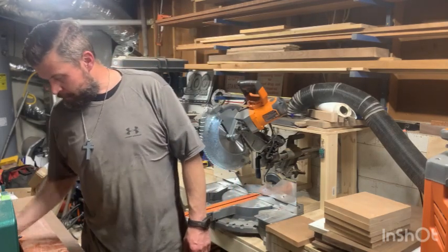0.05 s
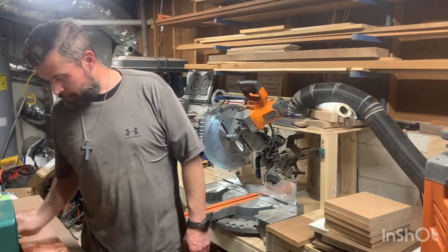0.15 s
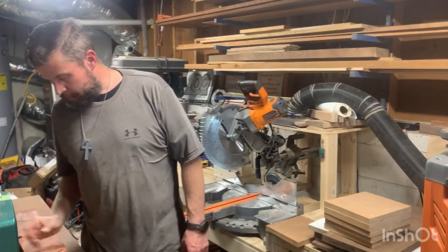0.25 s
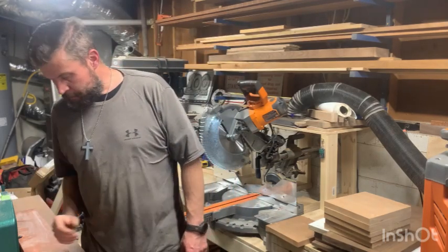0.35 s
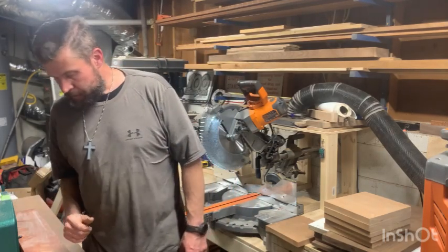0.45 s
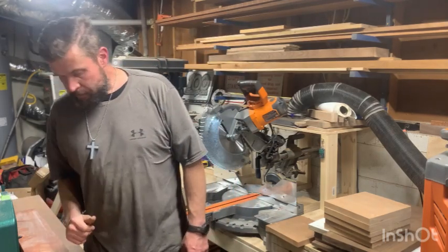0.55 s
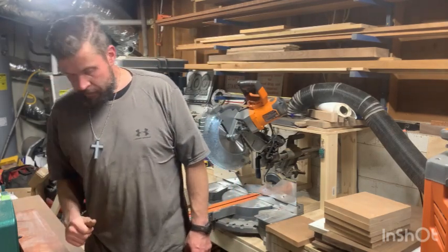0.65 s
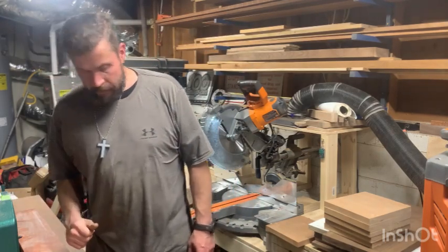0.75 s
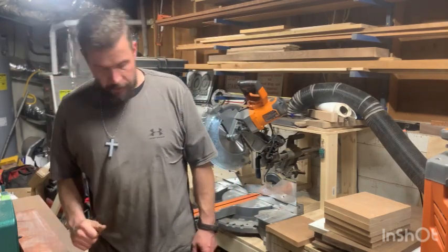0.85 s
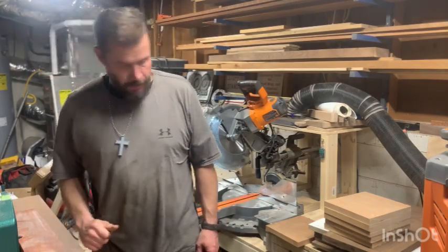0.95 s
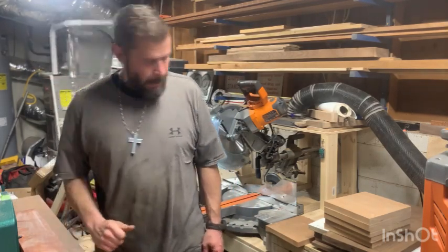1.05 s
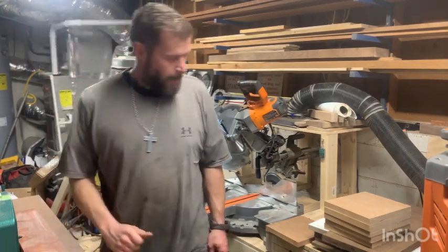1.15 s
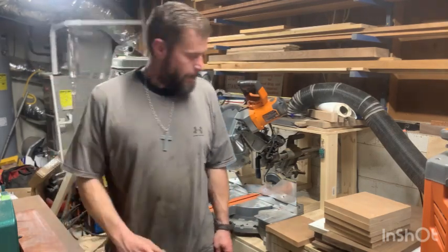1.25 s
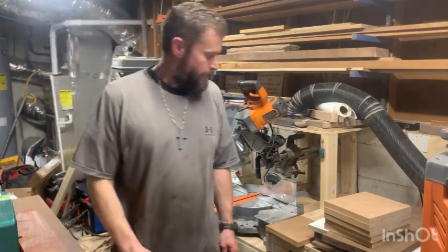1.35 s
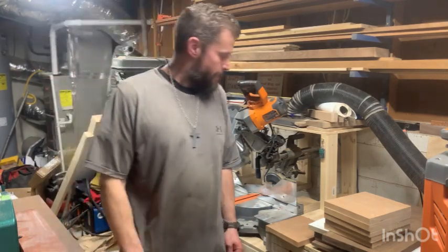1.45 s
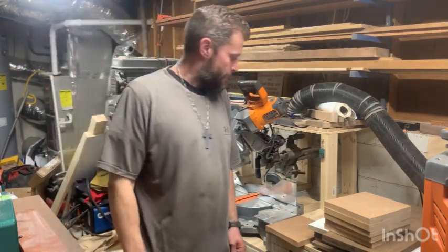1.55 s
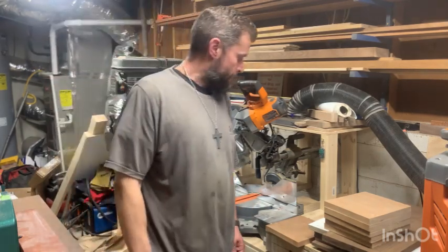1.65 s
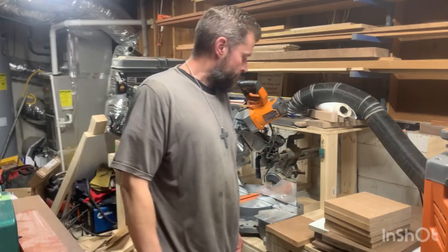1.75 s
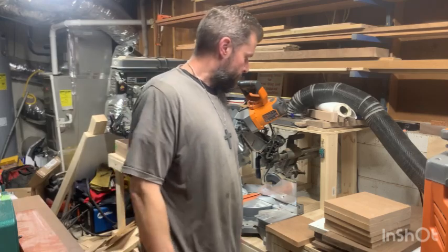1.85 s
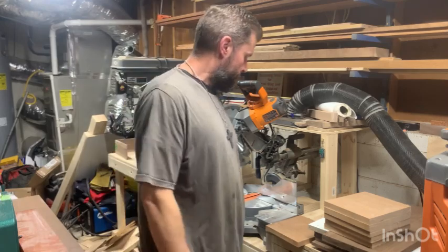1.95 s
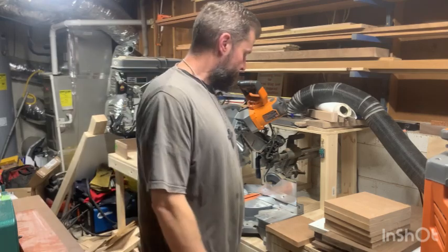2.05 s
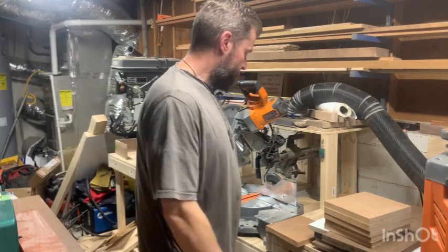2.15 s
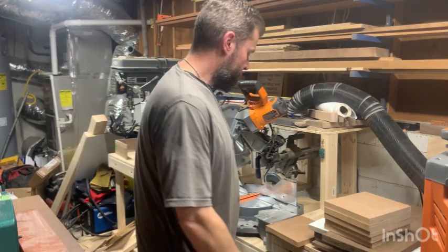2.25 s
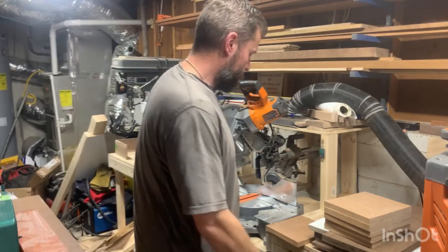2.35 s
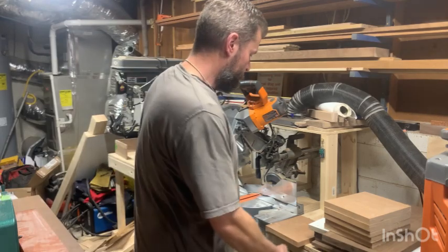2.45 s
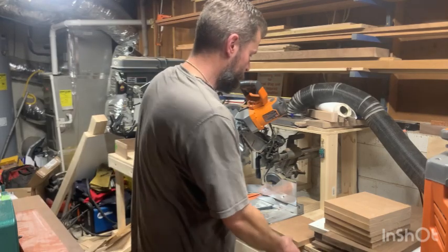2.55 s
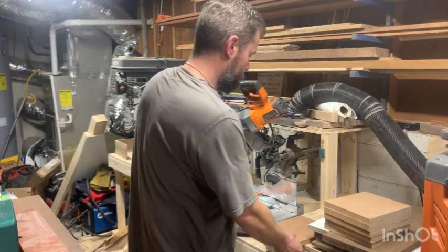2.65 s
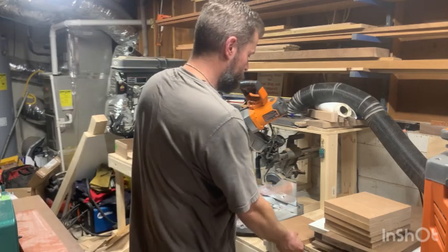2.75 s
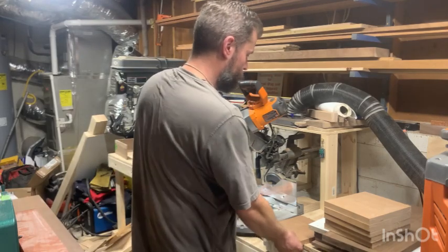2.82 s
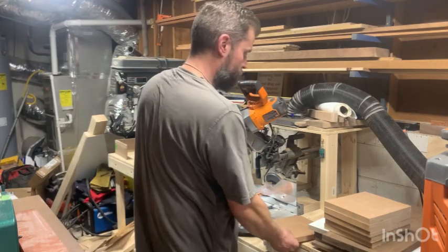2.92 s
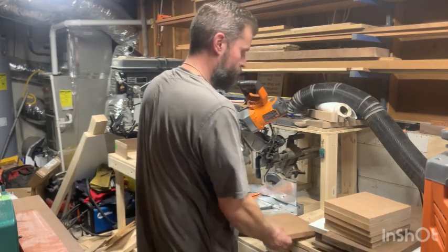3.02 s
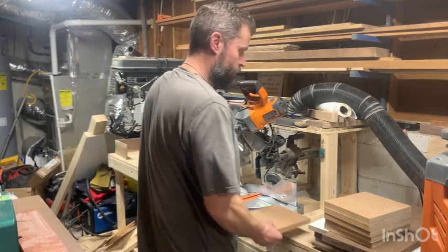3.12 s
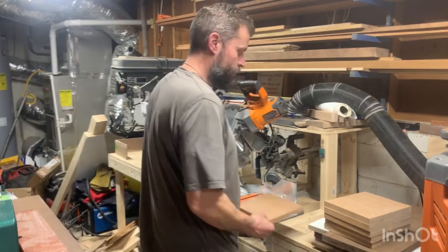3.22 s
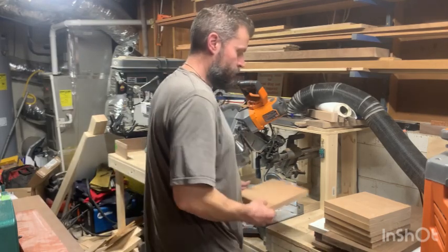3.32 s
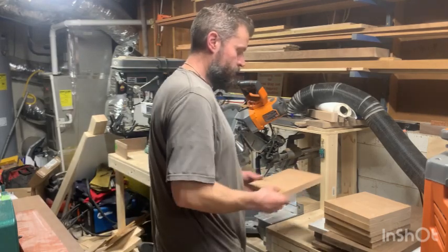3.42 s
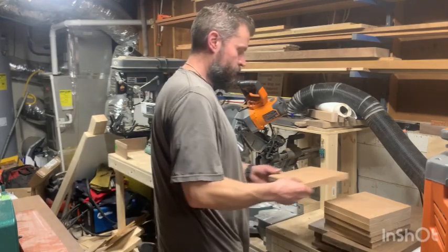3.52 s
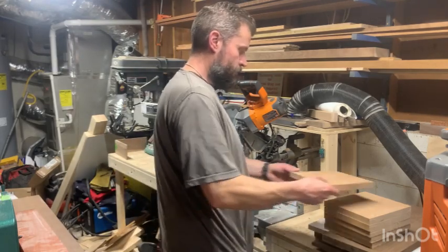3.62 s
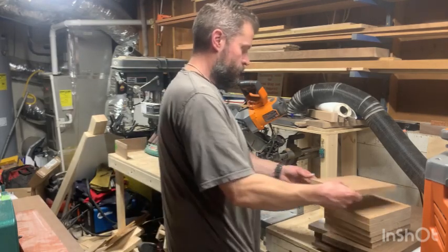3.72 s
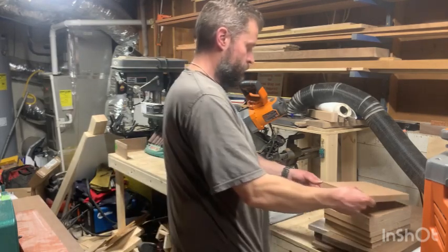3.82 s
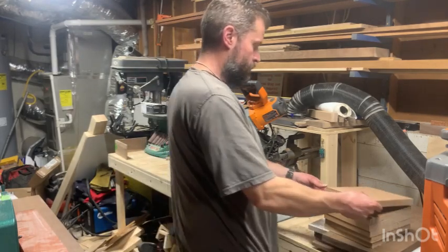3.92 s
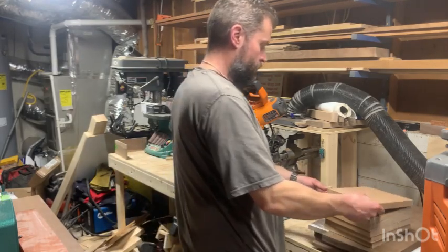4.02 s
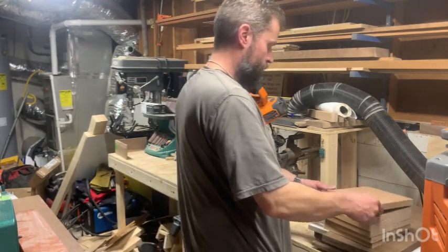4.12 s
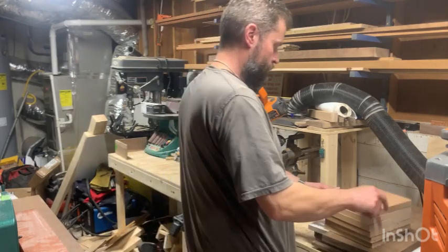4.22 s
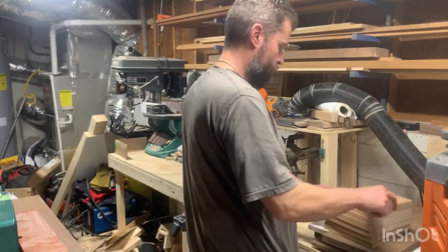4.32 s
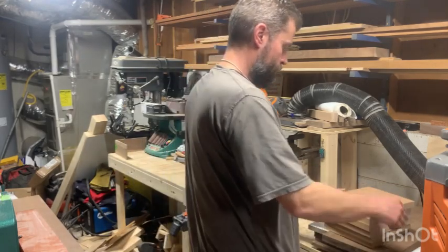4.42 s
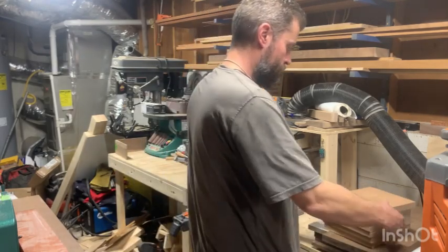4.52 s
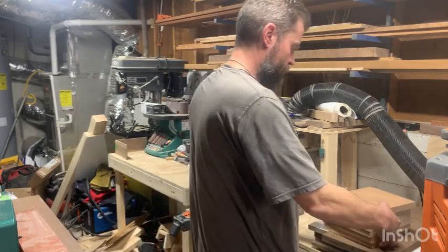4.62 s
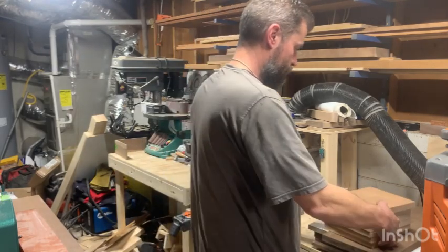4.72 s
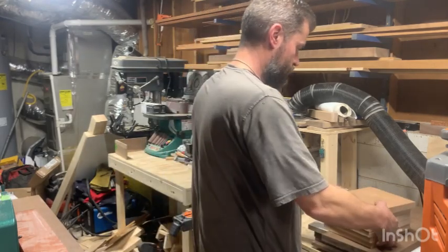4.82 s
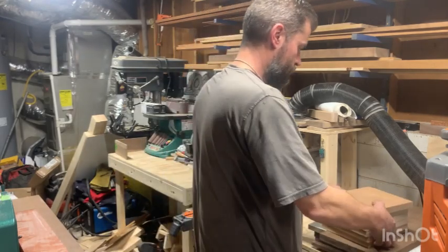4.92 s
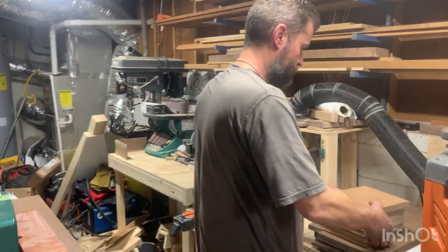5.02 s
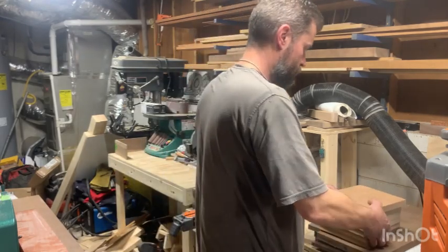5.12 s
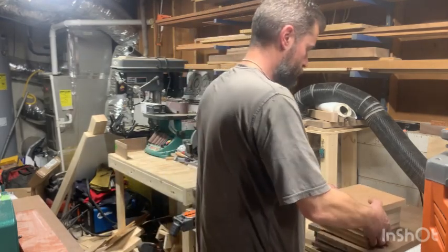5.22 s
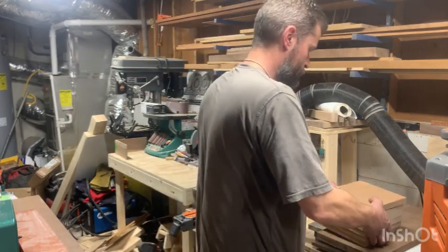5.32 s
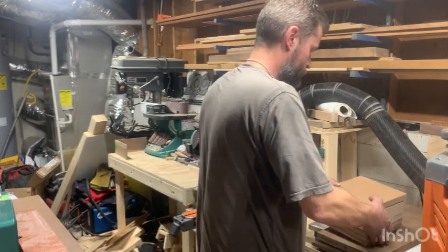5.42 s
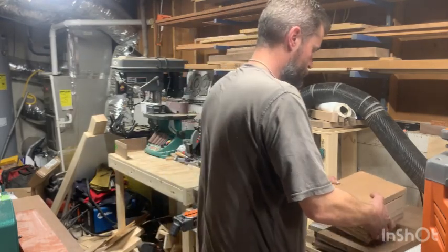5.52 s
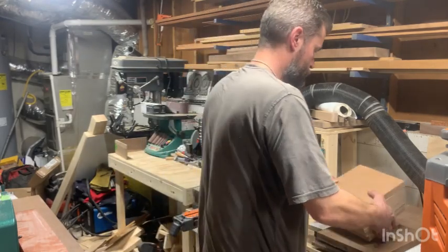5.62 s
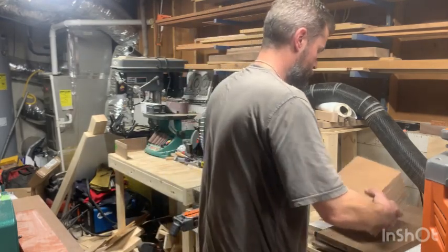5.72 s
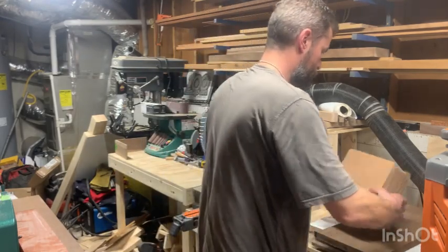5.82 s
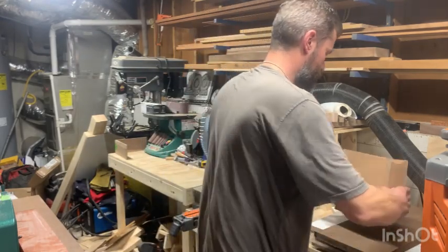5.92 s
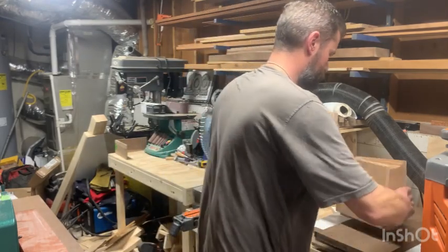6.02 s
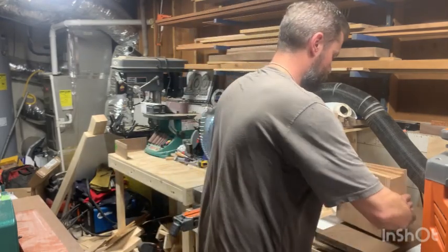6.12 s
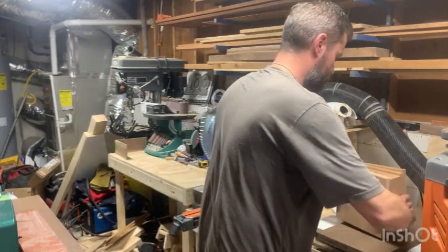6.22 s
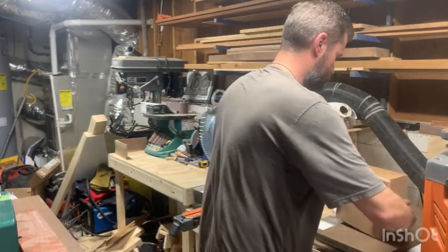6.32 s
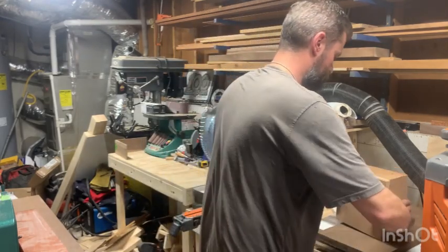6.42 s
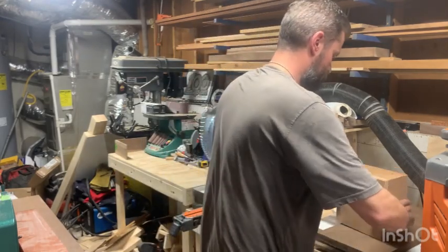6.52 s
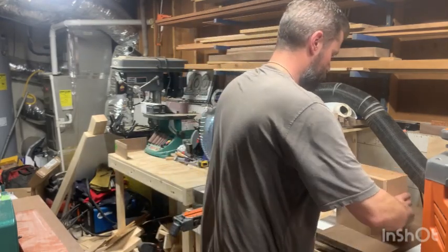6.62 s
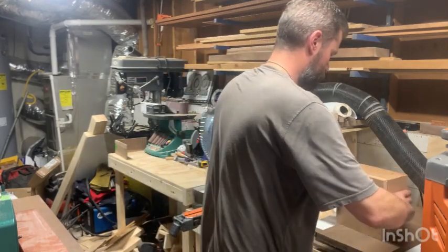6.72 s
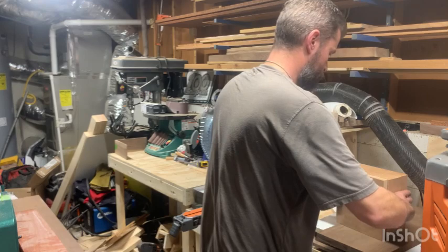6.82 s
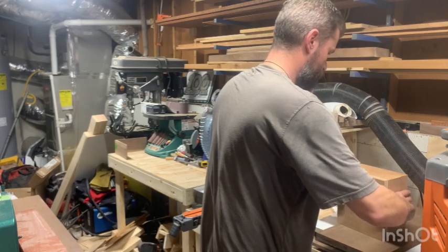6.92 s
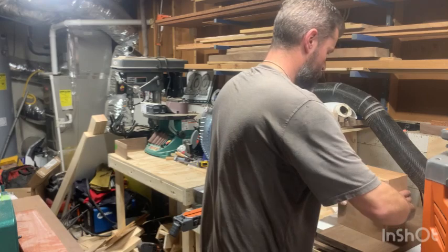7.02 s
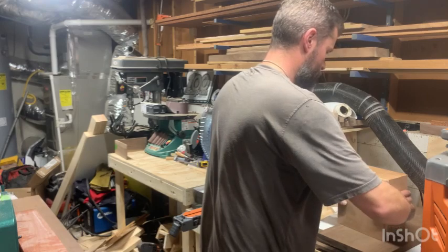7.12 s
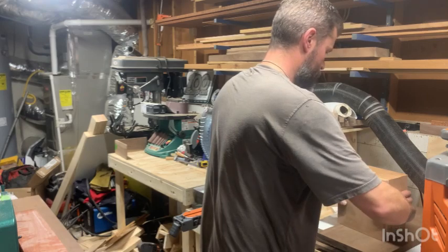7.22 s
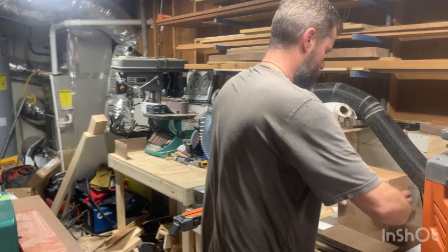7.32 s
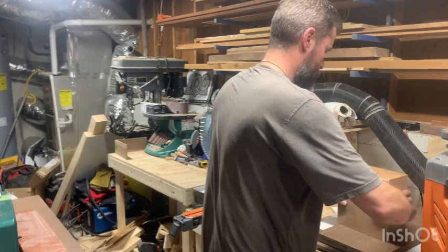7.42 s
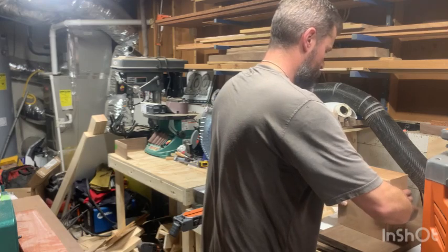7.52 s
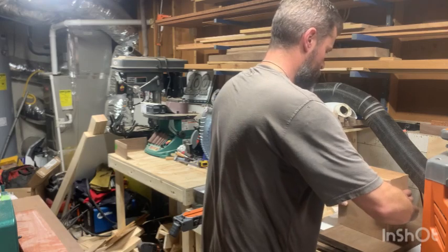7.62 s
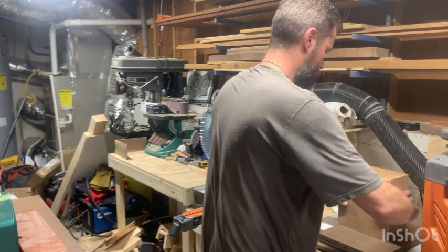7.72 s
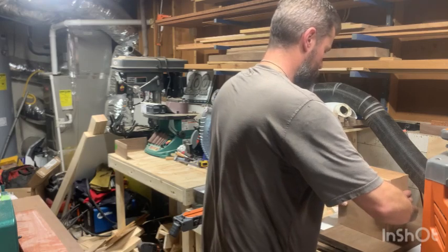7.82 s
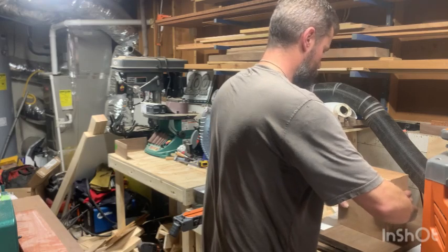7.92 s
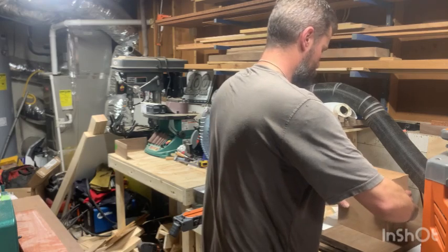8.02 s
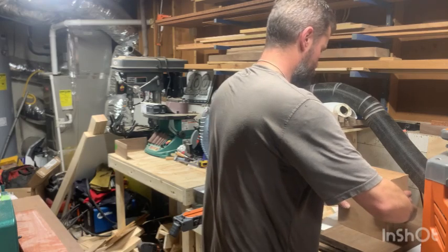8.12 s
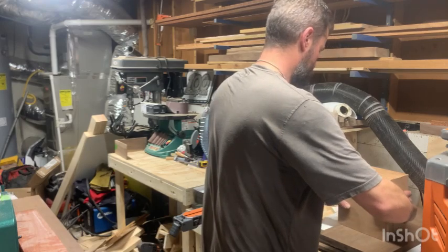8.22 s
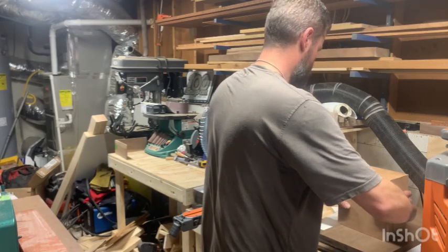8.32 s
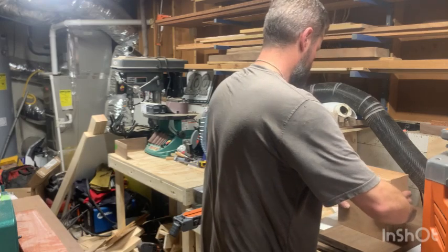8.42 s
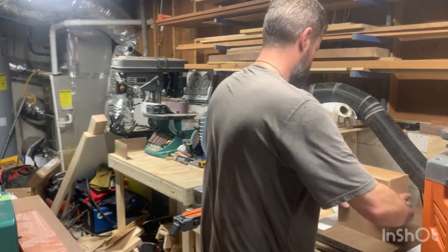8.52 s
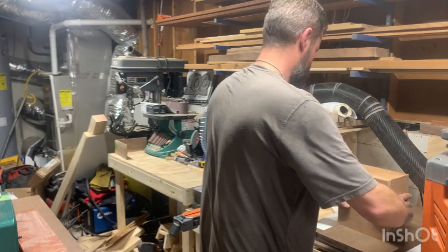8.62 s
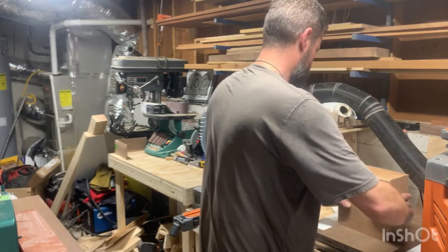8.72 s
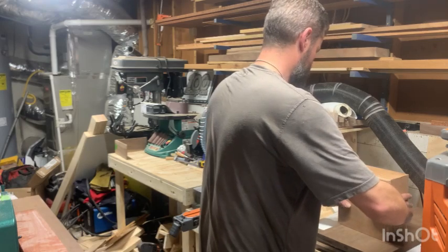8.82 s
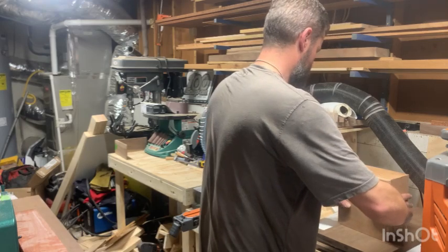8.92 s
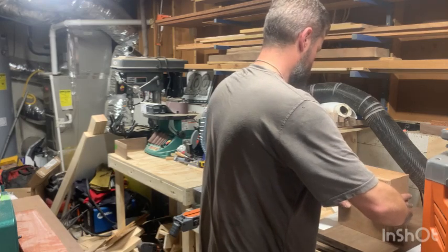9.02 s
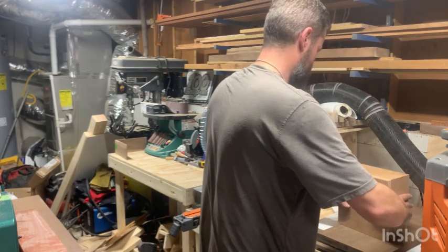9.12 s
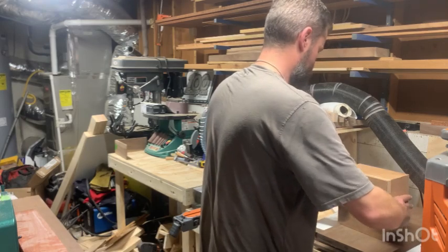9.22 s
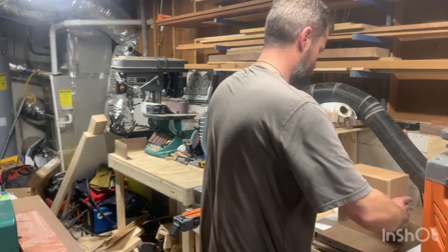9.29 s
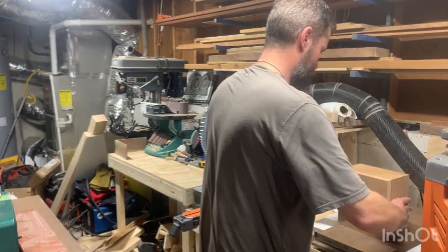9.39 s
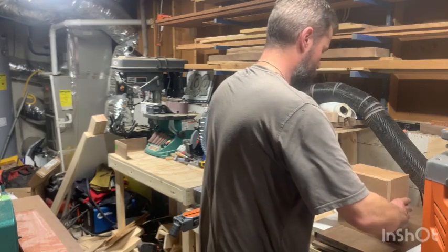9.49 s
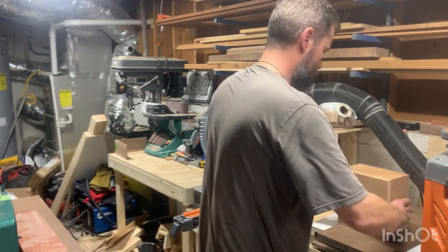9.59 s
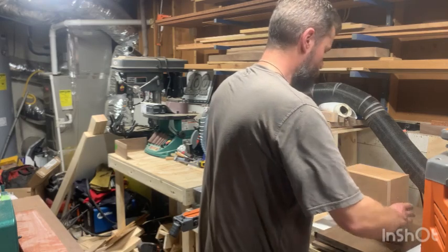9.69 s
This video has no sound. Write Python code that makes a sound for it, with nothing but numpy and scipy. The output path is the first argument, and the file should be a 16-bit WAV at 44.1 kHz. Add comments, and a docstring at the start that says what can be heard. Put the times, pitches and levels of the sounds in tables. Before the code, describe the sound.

Soft scuffs and a light rattle, one board slapped down, then a burst of heavy wooden knocks, with low air rumble throughout a cluttered indoor shop.

```python
"""Handling wooden blanks in a workshop

One board is laid on a pile on a bench, then the pile is stood on edge and knocked square: each blow is
a force pulse with trailing slaps that rings decaying modes, plus a noise crack from the meeting faces.
Wood and clothes scuff in between as shaped noise, with a short rattle of taps and a faint narrow whine.
A ventilation unit rumbles throughout as noise with duct resonances; the cluttered room adds a tail.
"""
import sys
import numpy as np
from scipy import signal
from scipy.fft import rfft, irfft
from scipy.io import wavfile
from scipy.ndimage import uniform_filter1d

SR = 44100
rng = np.random.default_rng(int(sys.argv[2]) if len(sys.argv) > 2 else 0)


def persist_wave(psi):
    """Save psi, clipped to +-1, as 16-bit WAV."""
    counts = np.round(np.clip(psi, -1, 1) * 32767).astype(np.int16)
    wavfile.write(sys.argv[1], SR, np.atleast_2d(counts).T)


N = 429975  # samples


def undb(db):
    """Level law: decibels become an amplitude ratio."""
    return 10 ** (np.asarray(db) / 20)


def unit(x):
    """Normalisation to a root-mean-square amplitude of one."""
    return x / np.sqrt(np.mean(x ** 2))


def along(table, hz):
    """Interpolation of (frequency [Hz], value) rows on a logarithmic frequency axis."""
    f, v = np.transpose(table)
    return np.interp(np.log(np.maximum(hz, 1)), np.log(f), v)


def band(x, lo_hz, hi_hz):
    """Band-pass filtering between two corner frequencies."""
    corners = [lo_hz, min(hi_hz, .45 * SR)]
    return signal.sosfilt(signal.butter(2, corners, "bandpass", fs=SR, output="sos"), x)


def walk(rate):
    """Slow random modulation: levels held 1 / rate seconds and slewed, with a spread near 1."""
    k = int(SR / rate)
    return uniform_filter1d(np.repeat(rng.standard_normal(N // k + 1), k), k)[:N]


def pair(n, gain, likeness, right_leads=0.):
    """Interchannel coherence: shared and opposed noise set the left-right correlation by frequency."""
    c = np.clip(along(likeness, np.fft.rfftfreq(n, 1 / SR)), 0, 1)
    mid, side = rfft(rng.standard_normal((2, n))) * gain * np.sqrt([1 + c, 1 - c])
    return irfft(np.array([mid + side, (mid - side) * np.exp(1j * right_leads)]), n) / 2


def add(out, s, x):
    """Superposition of a sound from time s on."""
    i = int(s * SR)
    out[i:i + len(x)] += x[:max(len(out) - i, 0)]


def late(x, size):
    """Propagation delay by a number of samples."""
    return np.pad(x, (size, 0))[:len(x)]


# broad spectrum of the air roar: (frequency [Hz], relative power density [dB])
AIR_SPECTRUM = [(18, -56), (35, -24.5), (50, -1), (140, -4.5), (170, -14.5), (260, -19.5), (420, -28.5),
                (900, -33), (1700, -49.5), (2900, -57), (3700, -81.5), (6000, -61.5), (8500, -52),
                (11000, -61.5), (13000, -63), (16000, -68)]
# duct resonances: (frequency [Hz], width [Hz], relative power density [dB])
DUCT_RESONANCES = [(60.5, 13, -0.5), (101.2, 25.2, 2.5), (126.8, 16, -4.5), (196.6, 27, -12.5),
                   (285, 22.04, -27), (349.9, 31, -12.5), (652.7, 31.4, -22.5), (745.4, 12, -25),
                   (1522, 217, -39.5)]
# left-right correlation of the roar: (frequency [Hz], correlation [1])
AIR_LIKENESS = [(100, 0.98), (350, 0.95), (550, 1), (1000, 1), (2000, 0.14), (6000, 0.15)]
# phase lead of the right side: (frequency [Hz], lead [rad])
AIR_RIGHT_LEADS = [(40, 0.56), (330, -0.37), (600, -1.25), (1200, -1.62), (2400, -3.5), (4400, -7.5)]


def ventilation(level_db=-34.5, swell_db=0.77):
    """Flow noise: a broad roar plus resonance peaks, a little louder on the left, swelling slowly."""
    hz = np.fft.rfftfreq(N, 1 / SR)
    power = undb(2 * along(AIR_SPECTRUM, hz))
    for centre_hz, width_hz, db in DUCT_RESONANCES:
        power = power + undb(2 * db) / (1 + (2 * (hz - centre_hz) / width_hz) ** 4)
    roar = unit(pair(N, np.sqrt(power), AIR_LIKENESS, along(AIR_RIGHT_LEADS, hz)))
    balance = undb([[.3], [-.3]])
    return balance * roar * undb(level_db + swell_db * walk(1.0))


# slow shifting of clothes and feet: (time [s], level [dB])
STIR_LEVELS = [(0, -67.5), (.3, -74), (1.4, -66), (3.3, -69), (4.5, -64.5), (5.5, -68), (7.2, -71),
               (9.75, -73)]


def stir(patchy_db=2.5):
    """Friction noise: a faint rustle from all round, each half octave coming and going by itself."""
    s, db = np.transpose(STIR_LEVELS)
    rustle = 0
    for hz, tilt_db in [(1100, 0.0), (1600, -1.5), (2300, 0.5), (3200, -7.5), (4500, -7.0)]:
        half_octave = band(rng.standard_normal((2, N)), hz / 1.25, hz * 1.164)
        rustle = rustle + half_octave * undb(tilt_db + patchy_db * walk(6.7))
    return unit(rustle) * undb(np.interp(np.arange(N) / SR, s, db))


# course of the whine before its random wavering: (time [s], level [dB])
WHINE_LEVELS = [(0, -78), (1.9, -80), (2.05, -92), (3.42, -88), (3.5, -69), (3.65, -89)]


def whine(hz=2290, width_hz=50, waver_db=5.6):
    """Narrow-band noise: a small bandwidth is heard as a faint, wavering pitch."""
    s, db = np.transpose(WHINE_LEVELS)
    tone = unit(band(rng.standard_normal((2, N)), hz - width_hz / 2, hz + width_hz / 2))
    return tone * undb(np.interp(np.arange(N) / SR, s, db) + waver_db * walk(7))


# rubs, and at 4.237 s the bright crack swelling out of the blow at 4.23 s: (time of the height [s], # length of
# rise and of fall [ms], level [dB], grain centre [Hz], dry hiss relative to the grain [dB])
SCUFF_RUBS = [(0.419, 120, -69.5, 2540, -6.5), (.55, 53, -66.5, 1390, -7), (1.579, 90, -76, 3000, 1),
              (1.868, 24, -62.5, 3300, -3), (1.955, 20, -64.5, 2500, -24), (2.239, 23, -56.5, 2700, -17),
              (2.335, 40, -55.5, 2500, -10.5), (2.609, 23, -55, 3500, 4), (2.939, 69, -60, 1770, -29),
              (3.299, 18, -70.5, 3500, 1), (3.605, 45, -56, 1930, -20), (4.042, 31, -58.5, 3500, 3),
              (4.12, 97, -62.5, 2320, -23), (4.237, 5.3, -48.5, 2500, -23), (5.029, 55, -65.5, 1960, -15),
              (5.722, 24, -64, 2700, -8), (6.05, 61, -70.5, 2600, -6), (6.561, 61, -61.5, 1900, -24),
              (7.473, 47, -67.5, 1970, -13), (9.665, 44, -65, 3210, -7), (9.745, 58, -55.5, 3570, 0)]
# brief ticks: (time of the height [s], level [dB], grain centre [Hz], dry hiss relative to the grain [dB])
SCUFF_TICKS = [(.399, -65, 4000, -15), (0.521, -57, 1280, -25), (3.577, -50, 2420, -3.5),
               (3.729, -49, 2350, -11)]
TICK_RISE_MS, TICK_FALL_MS = 0.58, 5.8
GRAIN_WIDTH = 1.36  # width of the grain resonance over its centre


def scuffs(grit_db=2.5, snag_db=9, snags_per_s=500, hiss_lo_hz=5500, hiss_hi_hz=13000):
    """Sliding friction: gritty noise catching on fibres excites a broad grain resonance, under a dry hiss."""
    out, t_ms = np.zeros(N), 1e3 * np.arange(-.3 * SR, .4 * SR) / SR
    rubs = [(s, ms, ms, *rest) for s, ms, *rest in SCUFF_RUBS]
    rubs += [(s, TICK_RISE_MS, TICK_FALL_MS, *rest) for s, *rest in SCUFF_TICKS]
    for s, rise_ms, fall_ms, db, hz, hiss_db in rubs:
        chance, width_hz = rng.standard_normal((4, len(t_ms))), GRAIN_WIDTH * hz
        swell = np.where(t_ms < 0, np.exp(-(t_ms / rise_ms) ** 2), np.exp(-(t_ms / fall_ms) ** 2))
        grit = undb(grit_db * unit(uniform_filter1d(chance[2], size=150)))
        caught = rng.random(len(t_ms)) < snags_per_s / SR
        friction = chance[0] * (1 + undb(snag_db) * caught * np.abs(chance[3]))
        # the corners have the grain centre as their geometric mean
        lo_hz = np.sqrt(hz ** 2 + width_hz ** 2 / 4) - width_hz / 2
        grain = unit(band(friction, lo_hz, lo_hz + width_hz))
        hiss = undb(hiss_db) * unit(band(chance[1], hiss_lo_hz, hiss_hi_hz))
        add(out, s - .3, undb(db) * swell * grit * (grain + hiss))
    return out


# a blow touches for a share of the cycle that it excites best
CONTACT_CYCLES, LONGEST_CONTACT_MS = 0.43, 0.99
SLAP, SLAPS_PER_S = .28, 1500  # size of the trailing slaps against the blow, and their rate
SCATTER_DB = 1.5  # each blow lands elsewhere and weighs the modes anew
CRACK_HZ, BRIGHTER_OCT_PER_DB = 2530, 0.1  # top of the crack at 1 ms and 0 dB; weaker blows are duller
SNAP_DB_PER_DB = 0.86  # weaker blows have less of the crack's bright edge


def knocks(blows, modes_hz, rings, octaves, grips=((np.inf, []),), crack_rise_ms=1.53, snap_db=-40):
    """Modal excitation by impact: a smooth push and smaller slaps ring the wood's modes; the faces crack."""
    out, t = np.zeros((2, N)), np.arange(int(.3 * SR)) / SR  # rows: body, crack
    hz, mode_db, t60 = np.array([modes_hz, *np.transpose(rings)])[:, :, None]
    for s, blow_db, best_hz, chatter_ms, crack_db in blows:
        contact_ms = min(1e3 * CONTACT_CYCLES / best_hz, LONGEST_CONTACT_MS)
        chance = rng.standard_normal((3, len(t)))
        detuned_hz = hz * (1 + .003 * chance[0, :len(hz), None])

        # where it is struck decides which modes speak; the grip stills some and frees others
        place_db = np.maximum(-6 * (np.log2(hz / best_hz) / octaves) ** 2, -30)
        place_db = place_db + SCATTER_DB * chance[0, -len(hz):, None]
        grip = next(g for until, g in grips if s < until)
        for node_hz, grip_db in grip:
            place_db = place_db + grip_db * np.exp(-(np.log2(hz / node_hz) / .11) ** 2)

        # neighbouring modes move the struck point in opposite ways
        sign = (-1.) ** np.arange(len(hz))[:, None]
        decay = undb(place_db + mode_db - 60 * t / t60)
        ring = np.sum(sign * decay * np.sin(2 * np.pi * detuned_hz * t), axis=0)

        trail = np.exp(-1e3 * t / chatter_ms)
        slaps = SLAP * trail * chance[1] * (rng.random(len(t)) < SLAPS_PER_S / SR)
        slaps[0] = 1  # the blow itself
        push = np.sin(np.pi * np.clip(1e3 * t[:300] / (2 * contact_ms), 0, 1)) ** 4
        force = signal.fftconvolve(slaps, push / push.sum())
        body = signal.fftconvolve(force, ring)[:len(t)]

        # short, strong contacts crack brighter
        top_hz = CRACK_HZ * 2 ** (BRIGHTER_OCT_PER_DB * max(blow_db, -30)) / contact_ms ** .5
        burst = unit(band(chance[2], 400, max(top_hz, 900)))
        edge = unit(band(band(chance[2], 1600, 6800), 900, 7400))
        snap = undb(snap_db + SNAP_DB_PER_DB * blow_db) * np.minimum(250 * t, 1) * edge
        crack = trail * (1 - np.exp(-1e3 * t / crack_rise_ms)) * (burst + snap)
        add(out[0], s, undb(blow_db) * body / np.abs(body).max())
        add(out[1], s, undb(blow_db + crack_db) * crack)
    return out


# light taps: (time [s], blow [dB], best excited frequency [Hz])
RATTLE_TAPS = [(2.887, -50, 3200), (2.894, -54, 2500), (2.91, -47, 2800), (2.922, -45, 2300),
               (2.926, -47, 1300), (2.936, -42, 2500), (2.961, -43, 2500), (2.979, -42, 2300),
               (2.999, -59, 2400), (3.292, -53, 4100)]
# modes of the rattling wood: (frequency [Hz])
RATTLE_MODES = [1200, 1500, 2400, 3100, 3350, 4080]
# ringing of each mode: (level [dB], T60 [s])
RATTLE_RINGS = [(7, 0.02), (-3, 0.042), (4, 0.034), (3, 0.02), (-3, .018), (5, 0.031)]


def rattle(chatter_ms=4.5, crack_db=-14):
    """Repeated light impact: a short run of taps on a few high modes."""
    taps = [(*tap, chatter_ms, crack_db) for tap in RATTLE_TAPS]
    return knocks(taps, RATTLE_MODES, RATTLE_RINGS, octaves=0.7)


# blows: (time [s], blow [dB], best excited frequency [Hz], chatter decay [ms], crack against blow [dB])
BOARD_IMPACTS = [(3.9435, -21.5, 1650, 4.4, -8.5), (3.948, -27, 500, 16, -14),
                 (3.975, -22, 1300, 4.7, -19.5), (4.011, -32, 1320, 7.8, -8), (4.05, -42.5, 1490, 9.9, -4),
                 (4.192, -18.5, 1100, 2.7, -7), (4.198, -15.5, 1590, 0.92, -20.5),
                 (4.23, -18.5, 300, 21, -13), (4.2425, -13, 1700, 1.5, -11),
                 (4.2485, -9.5, 1220, 1.5, -8.5), (4.255, -19.5, 2260, 2.5, -13),
                 (4.266, -16, 249, 4.4, -13), (4.465, -54, 2500, 5.3, 4)]
# modes of the board: (frequency [Hz])
BOARD_MODES = [135, 215, 340, 405, 720, 925, 1002, 1090, 1180, 1195, 1290, 1480, 1575, 1710, 1840, 2095,
               2185, 2470, 2630, 3100, 3400]
# ringing of each mode: (level [dB], T60 [s])
BOARD_RINGS = [(-7, 0.15), (3.5, 0.085), (-8, 0.075), (-9.5, 0.081), (-12, 0.03), (-1, 0.091), (0, 0.04),
               (-10, 0.079), (3.5, 0.045), (-16.5, 0.29), (-8.5, 0.044), (-2.5, 0.054), (3.5, 0.047),
               (-5.5, 0.042), (-8, 0.034), (-3, 0.042), (-6.5, 0.059), (-3.5, 0.043), (-5, 0.043),
               (-9, 0.04), (-9, 0.044)]
# how the board is held: (until [s], [(centre frequency [Hz], change of level [dB])])
BOARD_HOLDS = [(4.0, [(1100, -14), (1220, -24), (1800, -11), (2470, 5.5)]), (4.15, [(1150, -16), (1480, 4),
               (1580, -11)]), (4.22, [(1180, -17), (1750, 5), (900, -0.5)]), (4.246, [(1190, -11.5),
               (1570, -14)]), (9.75, [(950, -20.5), (1570, -14), (2095, -3)])]


def board():
    """Plate vibration: one board is laid on the pile, its modes weighted by the changing grip."""
    return knocks(BOARD_IMPACTS, BOARD_MODES, BOARD_RINGS, octaves=1, grips=BOARD_HOLDS)


# blows: (time [s], blow [dB], best excited frequency [Hz], chatter decay [ms], crack against blow [dB])
PILE_IMPACTS = [(6.1385, -19, 590, 7.8, -6.5), (6.149, -5.5, 460, 3.5, -13.5),
                (6.163, -6.5, 278, 1.4, -27.5), (6.206, -25.5, 1500, 4.5, -5), (6.21, -18, 330, 16, -24),
                (6.219, -26.5, 1900, 4.2, -7), (6.236, -22.5, 330, 11, -16), (6.266, -19, 300, 19, -14),
                (6.288, -17, 300, 17, -14.5), (6.305, -11, 230, 10, -24), (6.317, -6.5, 447, 7.8, -16),
                (6.327, -3, 402, 4.3, -14.5), (6.331, -18, 2140, 8.3, -4), (6.339, -13, 1200, 6.1, -9.5),
                (6.344, -6.5, 360, 2.9, -16), (6.351, -8, 330, 1.8, -15), (6.357, -16, 1000, 4.2, -23),
                (6.365, -13, 298, 3.1, -30), (6.379, -10.5, 324, 4.3, -18), (6.41, -28, 405, 22, -11),
                (6.5765, -15.5, 1240, 5.3, -5), (6.585, -10, 560, 0.93, -20), (6.592, -17.5, 774, 5.4, -15),
                (6.598, -9.5, 270, 2, -19), (6.624, -23.5, 590, 3.7, -13), (6.649, -22, 300, 3.6, -12)]
# modes of the pile: (frequency [Hz])
PILE_MODES = [140, 220, 255, 303, 341, 361, 410, 474, 520, 545, 630, 674, 740, 785, 880, 960, 1025, 1094,
              1180, 1300, 1450, 1560, 1800, 2100, 2400, 2800, 3100]
# ringing of each mode: (level [dB], T60 [s])
PILE_RINGS = [(-5.5, 0.057), (-1, 0.046), (0.5, 0.053), (0, 0.047), (2.5, 0.059), (-1.5, 0.046),
              (-6, 0.061), (-3, 0.031), (-5, 0.047), (-10, 0.054), (-6.5, 0.041), (-7, 0.052), (-11, 0.024),
              (-8.5, 0.043), (-10.5, 0.03), (-9, 0.027), (-8.5, 0.044), (-4.5, 0.031), (-12, 0.044),
              (-9, 0.024), (-13.5, 0.027), (-14.5, 0.032), (-13, 0.035), (-10.5, 0.051), (-18, 0.043),
              (-22, .04), (-19, .04)]
# how the pile is held: (until [s], [(centre frequency [Hz], change of level [dB])])
PILE_HOLDS = [(6.27, [(414, -16), (1010, 8.5), (660, -6.5)]), (6.5, [(247, -4.5), (402, -10), (1800, -7.5),
              (700, 1)]), (9.75, [(218, -16), (305, -4.5), (1110, -9.5), (1500, 4), (506, 3)])]


def pile():
    """Coupled impact: the pile is knocked square, with slower-rising cracks and a bright edge."""
    return knocks(PILE_IMPACTS, PILE_MODES, PILE_RINGS, octaves=1, grips=PILE_HOLDS,
                  crack_rise_ms=3.0, snap_db=-14)


# reverberation time of the workshop: (frequency [Hz], T60 [s])
SHOP_DECAY = [(150, 0.46), (400, 0.32), (1000, 0.27), (2800, 0.23), (4500, 0.24), (7000, 0.11),
              (14000, 0.098)]
# left-right correlation of the room tail: (frequency [Hz], correlation [1])
TAIL_LIKENESS = [(100, 0.81), (300, 0.72), (550, 0.19), (1000, 0.2), (2000, 0.092), (6000, 0.092)]
SHOP_BASS_HZ = 294  # the clutter soaks up the tail below this


def shop(x, wet_db, gap_ms=5.):
    """Reverberation: direct sound, then a dense tail that decays at its own rate in each half octave."""
    n = SR // 2
    t, hz, tail = np.arange(n) / SR, np.fft.rfftfreq(n, 1 / SR), 0
    for centre_hz in 90 * 2 ** np.arange(0, 7.6, .5):
        window = np.cos(np.pi * np.clip(np.log2(hz / centre_hz + 1e-9), -.5, .5))
        gain = window / (1 + (SHOP_BASS_HZ / centre_hz) ** 2)
        tail = tail + pair(n, gain, TAIL_LIKENESS) * undb(-60 * t / along(SHOP_DECAY, centre_hz))
    tail = tail * np.clip(1e3 * t / gap_ms - 1, 0, 1)  # silent for one gap, full after two
    tail = tail / np.sqrt(np.sum(tail ** 2) / 2)
    return x + undb(wet_db) * signal.fftconvolve(x[None], tail, axes=1)[:, :N]


# delay of the shelf echo on the left and right: (lag [samples])
ECHO_LAGS = (71, 118)


def shelves(x, hi_hz, level_db=-6):
    """Early reflection: nearby shelves throw back all but the bass, at another time for each side."""
    echo = undb(level_db) * band(x, 399.8, hi_hz)
    return np.array([late(echo, lag) for lag in ECHO_LAGS])


WOOD_LO_HZ, WOOD_HI_HZ = 145, 10900
WOOD_LEFT_LAG = 4  # samples
BODY_SHOP_DB, CRACK_SHOP_DB, SCUFF_SHOP_DB = -8, -2, -6.5  # level of the room tail for each sound


def scene():
    """Superposition of the wood, its room and echoes, the rubbing, the whine and the ventilation."""
    blows = rattle() + board() + pile()
    # small pieces radiate little bass, and the end grain swallows the top
    radiated = band(blows, WOOD_LO_HZ, WOOD_HI_HZ)
    body, crack = band(radiated, WOOD_LO_HZ / 2, 1.3 * WOOD_HI_HZ)
    wood = shop(body, BODY_SHOP_DB) + shop(crack, CRACK_SHOP_DB)
    left, right = wood + shelves(body + crack, WOOD_HI_HZ)
    # the bench stands to the right, so its sound reaches the left side later
    wood = np.array([late(left, WOOD_LEFT_LAG), right])
    return wood + shop(scuffs(), SCUFF_SHOP_DB) + stir() + whine() + ventilation()


CEILING = 1.1  # the loudest peaks are rounded towards this size
SPLIT_HZ, TOP_HZ = 5840, 15750  # treble above the split is one signal; little passes the top
TREBLE_LEFT_LAG = 10  # samples
LEFT_SHADE_HZ, LEFT_SHADE_DB = 4560, -4
DIP_HZ, DIP_DB = 7720, -8


def record(dry):
    """Saturation and filtering: rounded peaks, a shaded left, and one treble, late and inverted on the left."""
    dry = CEILING * np.tanh(dry / CEILING)
    low = signal.butter(6, SPLIT_HZ, "low", fs=SR, output="sos")
    high = signal.butter(6, SPLIT_HZ, "high", fs=SR, output="sos")
    upper_middle = signal.filtfilt(*signal.iirpeak(LEFT_SHADE_HZ, 1.5, fs=SR), dry[0])
    shaded_left = dry[0] - (1 - undb(LEFT_SHADE_DB)) * upper_middle
    treble = signal.sosfiltfilt(high, dry[1])
    both = signal.sosfiltfilt(low, np.array([shaded_left, dry[1]]))
    both = both + np.array([-late(treble, TREBLE_LEFT_LAG), treble])
    around_dip = signal.filtfilt(*signal.iirpeak(DIP_HZ, 4.5, fs=SR), both)
    both = both - (1 - undb(DIP_DB)) * around_dip
    return signal.sosfiltfilt(signal.ellip(10, .1, 50, TOP_HZ, fs=SR, output="sos"), both)


dry = scene()
out = record(dry)
persist_wave(out)
```